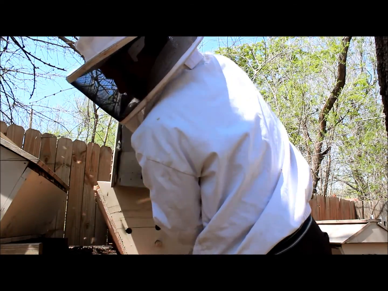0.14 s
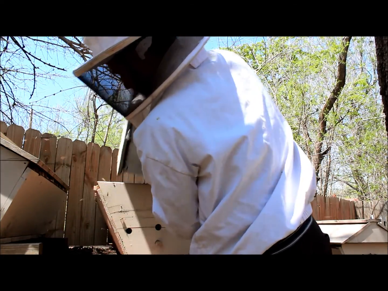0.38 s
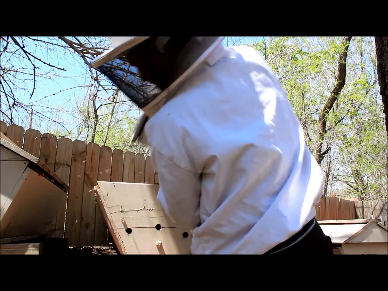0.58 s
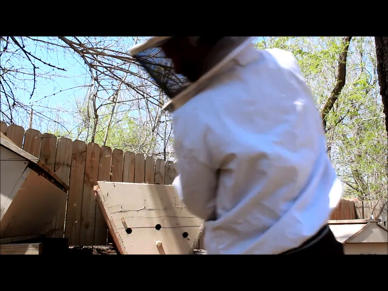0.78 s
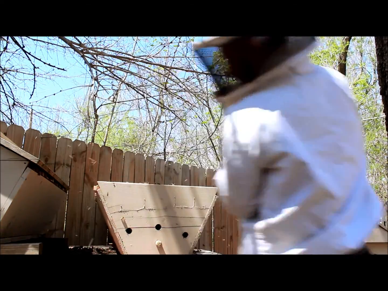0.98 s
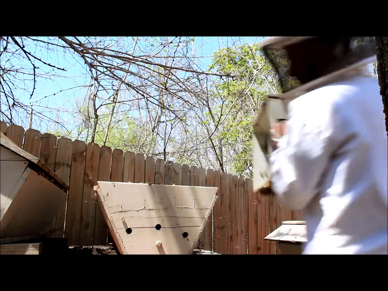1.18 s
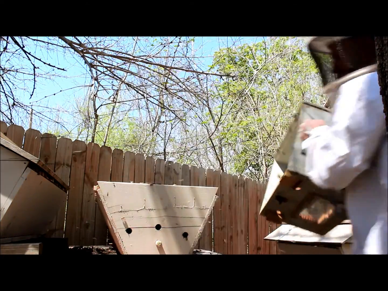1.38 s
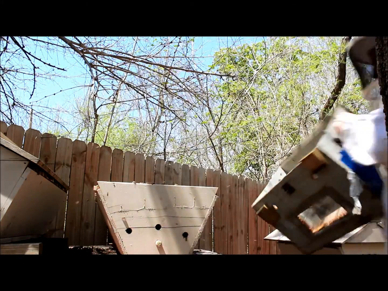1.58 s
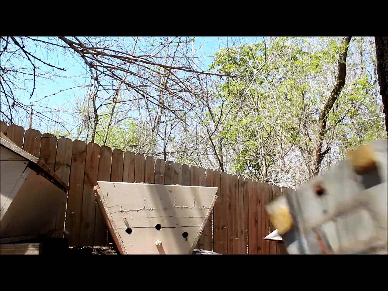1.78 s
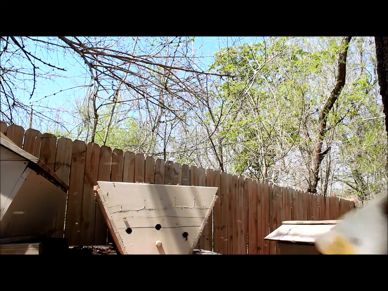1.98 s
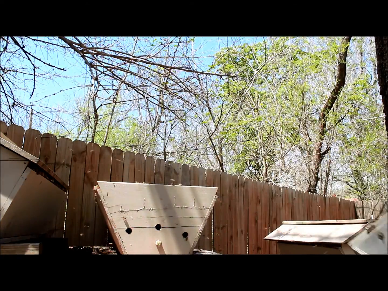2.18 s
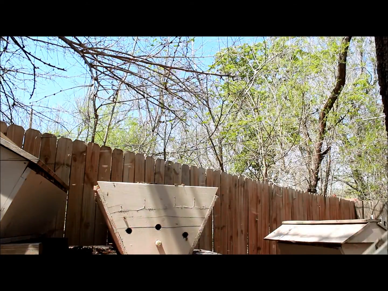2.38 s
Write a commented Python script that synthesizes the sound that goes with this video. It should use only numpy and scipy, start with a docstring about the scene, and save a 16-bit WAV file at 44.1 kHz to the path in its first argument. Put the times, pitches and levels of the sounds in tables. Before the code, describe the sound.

One loud, close wooden bump rings briefly over a steady hum of bees and low outdoor rumble. After a pause, the box scuffs against cloth, gives a tiny squeak and is set down with a clack and hollow thud.

```python
"""Honey bees hum around the microphone in a back yard, each a train of wingbeat pulses,
over a low tone and outdoor rumble. Close by, a wooden box bumps hard against the hive:
the wood rings, the microphone overloads and the gain ducks. The box is carried off, rubs
on the bee suit, squeaks once and is set down with a clack and a hollow thud."""
import sys
import numpy as np
from scipy import signal
from scipy.fft import rfft, irfft
from scipy.io import wavfile
from scipy.ndimage import uniform_filter1d

SR = 44100
rng = np.random.default_rng(int(sys.argv[2]) if len(sys.argv) > 2 else 0)


def generate_wav(sig):
    """Save sig (samples, or channels by samples) to the path in sys.argv[1] as 16-bit PCM at SR."""
    pcm = np.round(np.clip(np.atleast_2d(sig).T, -1, 1) * 32767).astype(np.int16)
    wavfile.write(sys.argv[1], SR, pcm)


N = 110250


def amp(db):
    """Decibels to gain."""
    return 10 ** (np.asarray(db) / 20)


def unit(x):
    """Scales to rms 1."""
    return x / np.sqrt(np.mean(x ** 2) + 1e-20)


def read(points, hz):
    """Reads a table on a log-frequency axis."""
    f, value = np.transpose(points)
    return np.interp(np.log(hz + 1), np.log(f + 1), value)


def curve(rows):
    """The columns of a time table, sample by sample."""
    times, *columns = np.transpose(rows)
    return [np.interp(np.arange(N) / SR, times, column) for column in columns]


def add(mix, start_s, sound):
    """Mixes a sound in at its start time."""
    part = mix[round(start_s * SR):][:len(sound)]
    part += sound[:len(part)]


def colour(x, gain):
    """Filters by a gain given as a function of frequency, then scales to rms 1."""
    return unit(irfft(rfft(x) * gain(np.fft.rfftfreq(len(x), 1 / SR)), len(x)))


def wander(top_hz):
    """Smooth random motion of rms about 1."""
    t, hz = np.linspace(0, N / SR, 600), top_hz * np.geomspace(.04, 1, 16)
    waves = np.sin(2 * np.pi * (hz * t[:, None] + rng.random(len(hz)))) / np.sqrt(hz)
    return np.interp(np.arange(N) / SR, t, unit(waves.sum(1)))


def dying(x, t60):
    """Lets each band of x die at its own speed."""
    hz, t, bands = signal.stft(x, SR, nperseg=256)
    decay = amp(-60 * t / read(t60, hz)[:, None])
    return signal.istft(bands * decay, SR, nperseg=256)[1][:len(x)]


# Colour of the buzz (frequency [Hz], gain [dB])
BUZZ_COLOUR = [(200, 2.5), (260, 1), (340, -22), (420, 0.5), (500, 4), (600, -9.5), (780, -6), (1250, -5.5),
               (2000, -24.5), (4000, -39), (8000, -56)]
# The swarm at the microphone (time [s], level [dB])
SWARM_LEVEL = [(0, -43), (.6, -44), (1.1, -41), (1.5, -42.5), (2.2, -43), (2.5, -41)]
def swarm(bees=28, wing_hz=232.5, spread=.15, drift=.022, drift_hz=7, flyby_db=3, flyby_hz=3):
    """Bees around the hive: each is a train of wingbeat pulses drifting in pitch and distance."""
    cycle = np.linspace(0, 1, 2048)
    pulse = sum(np.cos(2 * np.pi * k * cycle) for k in range(1, 36))
    buzz = np.zeros(N)
    for detune in np.linspace(-spread, spread, bees):
        hz = wing_hz * (1 + detune + drift * wander(drift_hz))
        turns = (np.cumsum(hz) / SR + rng.random()) % 1
        wingbeats = pulse[(turns * (len(pulse) - 1)).astype(int)]
        buzz += wingbeats * amp(flyby_db * wander(flyby_hz))
    tail = dying(rng.standard_normal(SR // 8), t60=[(100, 0.034), (8000, 0.11)])
    scattered = unit(signal.fftconvolve(buzz, tail)[:N])
    buzz += 0.25 * buzz.std() * scattered
    return amp(curve(SWARM_LEVEL)[0]) * colour(buzz, lambda f: amp(read(BUZZ_COLOUR, f)))


# The tone under the bees (time [s], pitch [Hz], fundamental [dB], octave [dB])
HUM_TRACK = [(0, 100, -53, -57), (.7, 100, -55, -44), (1.0, 100.5, -63, -60), (1.8, 101.2, -48, -43),
             (2.15, 101.8, -44.5, -50), (2.5, 102.2, -43.5, -45)]
def low_hum(waver=0.013, swing_db=3):
    """In the background, a low tone wavers and its octave swells and fades."""
    hz, fundamental_db, octave_db = curve(HUM_TRACK)
    phase = 2 * np.pi * np.cumsum(hz * (1 + waver * wander(24.9))) / SR
    octave = amp(octave_db + swing_db * wander(20)) * np.sin(2 * phase)
    return np.sqrt(2) * (amp(fundamental_db) * np.sin(phase) + octave)


# Ambience of the yard (frequency [Hz], relative density [dB])
AIR_COLOUR = [(10, -31), (25, -33), (50, -5), (90, -4.5), (135, 3), (180, -7), (240, -6), (310, -8),
              (470, -10.5), (620, -11.5), (1200, -13.5), (2000, -17.5), (4000, -26.5), (7000, -31),
              (10000, -35.5), (16000, -34.5)]
def open_air(level_db=-39.5, patch_db=0.82):
    """Rumble and hiss all around the microphone, with faint drifting patches."""
    hz, _, bands = signal.stft(rng.standard_normal(N), SR, nperseg=2048, noverlap=1536)
    patches = uniform_filter1d(rng.standard_normal(bands.shape), size=20, axis=0)
    patches = unit(uniform_filter1d(patches, size=7, axis=1))
    bands *= amp(read(AIR_COLOUR, hz)[:, None] + patch_db * patches)
    return amp(level_db) * unit(signal.istft(bands, SR, nperseg=2048, noverlap=1536)[1][:N])


def knocks(contacts, modes, wash_colour, wash_t60, bass_hz=95):
    """Each contact rings the wood's modes and a dense wash of further ones."""
    out, t = np.zeros(N), np.arange(SR // 3) / SR
    for start_s, modes_db, wash_db, low_hz, high_hz, rise_s in contacts:
        def contact(f):
            """Soft contacts are duller, glancing ones thinner."""
            return f ** 2 / np.sqrt((f ** 4 + low_hz ** 4) * (1 + (f / high_hz) ** 4))
        ring = sum(contact(hz) * amp(db - 60 * t / t60) * np.sin(2 * np.pi * hz * t)
                   for hz, db, t60 in modes)
        wash = colour(rng.standard_normal(len(t)), lambda f: amp(read(wash_colour, f)) * contact(f))
        attack = 1 - np.exp(-t / rise_s)
        add(out, start_s, attack * (amp(modes_db) * ring + amp(wash_db) * dying(wash, wash_t60)))
    # small wooden panels radiate little deep bass
    return signal.sosfilt(signal.butter(2, bass_hz, "high", fs=SR, output="sos"), out)


# Blows on the hive (time [s], modes [dB], wash [dB], low edge [Hz], high edge [Hz], rise [s])
HIVE_CONTACTS = [(.2096, -3, -10, 110, 1840, 0.0021), (.2283, -10, -16.5, 151, 2200, 0.0017),
                 (.258, -40, -26.5, 895, 4900, 0.0072), (.296, -30, -44, 120, 400, 0.0031)]
# Modes of the hive (frequency [Hz], relative level [dB], t60 [s])
HIVE_MODES = [(149.4, -13.5, 0.27), (201.8, 8.5, 0.073), (241.4, 2.5, 0.1), (321, -5.5, .08),
              (340.4, 4, 0.065), (430, 1, 0.066), (481, -1, 0.096), (768, -4.5, 0.047), (797, -4, 0.035),
              (916, -9.5, 0.046), (1206, -8.5, 0.032), (1604, -18.5, 0.086)]
# Its wash of dense modes (frequency [Hz], relative density [dB])
HIVE_WASH = [(30, -8), (150, -6), (400, -2.5), (620, -17), (900, -10), (1500, -17), (3000, -17),
             (6000, -15), (15000, -44)]
# Decay of that wash (frequency [Hz], t60 [s])
HIVE_WASH_T60 = [(100, 0.14), (600, 0.15), (2000, .11), (8000, 0.025)]
def hive_bumps():
    """Close to the microphone, the box strikes the hive and sets its walls ringing."""
    return knocks(HIVE_CONTACTS, HIVE_MODES, HIVE_WASH, HIVE_WASH_T60)


# Ticks close by (time [s], level [dB], centre [Hz], t60 [s])
HANDLING_TICKS = [(0.209, -35.5, 7740, 0.044), (0.2302, -21, 7000, 0.0079), (0.469, -46, 3730, 0.028),
                  (1.2966, -36.5, 3350, .035), (1.765, -39, 7000, 0.025), (1.773, -49, 8900, 0.094),
                  (1.849, -54, 4800, 0.033)]
def ticks(width_octaves=0.94):
    """Handling the box gives off brief, bright snaps of noise."""
    out, t = np.zeros(N), np.arange(SR // 10) / SR
    for start_s, db, centre_hz, t60 in HANDLING_TICKS:
        noise = rng.standard_normal(len(t))
        snap = colour(noise, lambda f: np.exp(-.5 * (np.log2((f + 1) / centre_hz) / width_octaves) ** 2))
        add(out, start_s, amp(db - 60 * t / t60) * snap)
    return out


# Decay of the yard's reflections (frequency [Hz], t60 [s])
YARD_DECAY = [(100, 0.42), (500, 0.37), (1200, 0.36), (3000, 0.17), (8000, 0.13)]
def yard_echo(near, level_db=-14.5, build_s=0.0072):
    """Farther off, fence and trees scatter a short, dull tail back to the microphone."""
    t = np.arange(SR // 2) / SR
    tail = dying(rng.standard_normal(len(t)), YARD_DECAY) * np.minimum(t / build_s, 1)
    return amp(level_db) * signal.fftconvolve(near, tail / np.linalg.norm(tail))[:N]


# Scuffing at the microphone (time [s], level [dB])
RUB_LEVEL = [(0, -82), (1.45, -58.5), (1.56, -54), (1.63, -43), (1.68, -56), (1.72, -47.5), (1.78, -45),
             (1.92, -48), (2.0, -74), (2.5, -79)]
# Colour of cloth on wood (frequency [Hz], relative density [dB])
RUB_COLOUR = [(100, -20), (300, 2), (1500, 2.5), (4000, -4), (7000, -14), (15000, -24)]
def suit_rub(rough_db=4.0, rough_hz=90.47):
    """The carried box rubs along the suit in faint, uneven scuffs."""
    level = amp(curve(RUB_LEVEL)[0] + rough_db * wander(rough_hz))
    return level * colour(rng.standard_normal(N), lambda f: amp(read(RUB_COLOUR, f)))


# Knocks of the box (time [s], modes [dB], wash [dB], low edge [Hz], high edge [Hz], rise [s])
BOX_CONTACTS = [(1.523, -40, -39, 600, 7000, 0.0092), (1.624, -30.5, -26.5, 150, 4000, .004),
                (1.652, -32.5, -39, 100, 7000, 0.0036), (1.762, -30, -33.5, 302, 1200, 0.0007),
                (1.798, -26.5, -32.5, 900, 6000, 0.00065), (1.801, -18, -26, 855, 1900, 0.00085),
                (1.807, -14.5, -24, 2200, 7050, 0.0012), (1.811, -20.5, -26.5, 150, 450, .002),
                (1.8305, -25.5, -26, 278, 690, 0.001), (1.885, -24.5, -46, 120, 400, 0.0054),
                (2.0025, -27.5, -26, 496, 2120, .001), (2.0095, -14.5, -17.5, 150, 450, 0.0034),
                (2.0225, -19, -41, 120, 306, 0.00084), (2.046, -24.5, -29, 200, 600, 0.0015)]
# Modes of the box (frequency [Hz], relative level [dB], t60 [s])
BOX_MODES = [(225, 1.5, 0.12), (239, -2, 0.091), (270, -9.5, 0.058), (299.4, -5.5, 0.16), (337, 1.5, 0.079),
             (431.5, -8.5, 0.16), (753.4, -4.5, 0.095), (1005, -2, 0.062), (1564, -0.5, 0.04),
             (1700, -17, 0.057), (2290, -27, 0.041), (3106, -6.5, 0.052), (3980, -11, .08),
             (4640, -15, 0.065), (5770, -22, .07), (8950, -31, .14)]
# Its wash of dense modes (frequency [Hz], relative density [dB])
BOX_WASH = [(60, -23), (170, -25), (280, 18), (550, -5), (1000, -0.5), (1700, -2), (3000, -8),
            (4800, -14.5), (7000, -27), (10000, -39), (16000, -36)]
# Decay of that wash (frequency [Hz], t60 [s])
BOX_WASH_T60 = [(100, 0.2), (600, 0.16), (2000, .11), (8000, 0.12)]
def box_landing():
    """Still nearby, the box knocks lightly, then lands with a clack and a hollow thud."""
    return knocks(BOX_CONTACTS, BOX_MODES, BOX_WASH, BOX_WASH_T60)


# The chirp and its reflections (delay [s], relative level [dB])
SQUEAK_ECHOES = [(0, -0.5), (.0085, -5.5), (0.0161, -3.5), (0.024, -17)]
def squeak(start_s=1.733, level_db=-22, chirp_s=0.0092, pitch_hz=3190, sag_hz_per_s=8400, octave_db=-22):
    """One short squeak, followed by a few quick, fading echoes; the weaker ones are purer."""
    out, t = np.zeros(N), np.arange(0, chirp_s, 1 / SR)
    phase = 2 * np.pi * np.cumsum(pitch_hz - sag_hz_per_s * t) / SR
    for delay_s, db in SQUEAK_ECHOES:
        chirp = np.sin(phase) + amp(octave_db + db / 2) * np.sin(2 * phase)
        add(out, start_s + delay_s, amp(level_db + db) * np.sin(np.pi * t / chirp_s) * chirp)
    return out


def scene():
    """One microphone by the hive: close handling and its echo over the bees and the open air."""
    near = hive_bumps() + box_landing() + ticks() + squeak() + suit_rub()
    return (near + yard_echo(near) + swarm() + low_hum() + open_air())[None]


def record(dry, threshold_db=-12, duck_share=0.82, attack_s=0.033, recover_db_per_s=33):
    """The microphone's gain ducks after a loud blow and recovers slowly; peaks clip; the top is cut."""
    ceiling, top_hz = 0.95, 15850
    power_db = 10 * np.log10(signal.lfilter(np.ones(300) / 300, 1, dry[0] ** 2) + 1e-12)
    recovery_db = np.arange(N) * recover_db_per_s / SR
    held_db = np.maximum.accumulate(power_db + recovery_db) - recovery_db
    over_db = np.maximum(held_db - threshold_db, 0)
    pole = np.exp(-1 / (attack_s * SR))
    ducked = dry * amp(-duck_share * signal.lfilter([1 - pole], [1, -pole], over_db))
    lowpass = signal.firwin(511, top_hz, window=("kaiser", 9), fs=SR)
    return signal.oaconvolve(np.clip(ducked, -ceiling, ceiling), lowpass[None], "same")


dry = scene()
out = record(dry)
generate_wav(out)
```